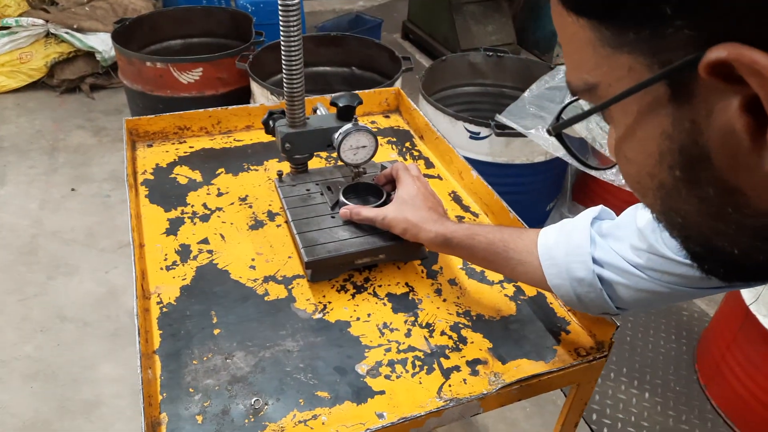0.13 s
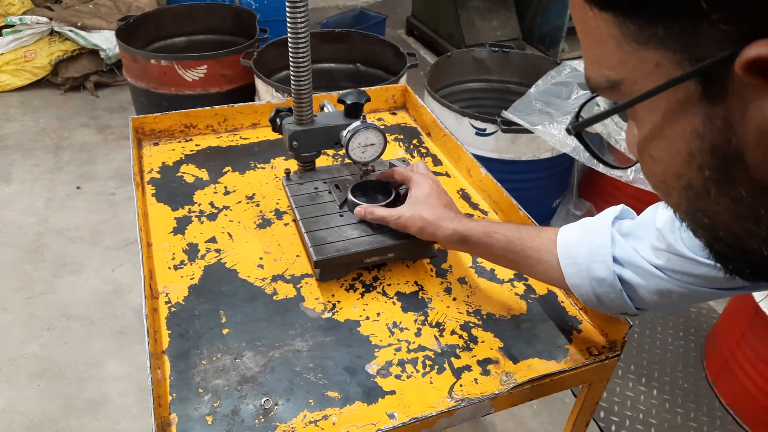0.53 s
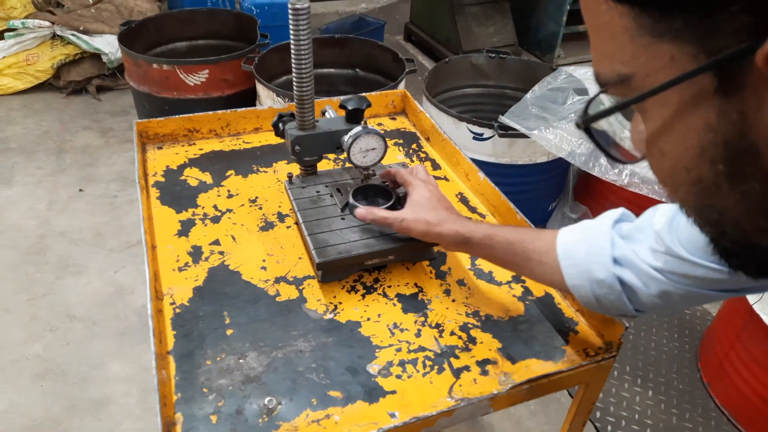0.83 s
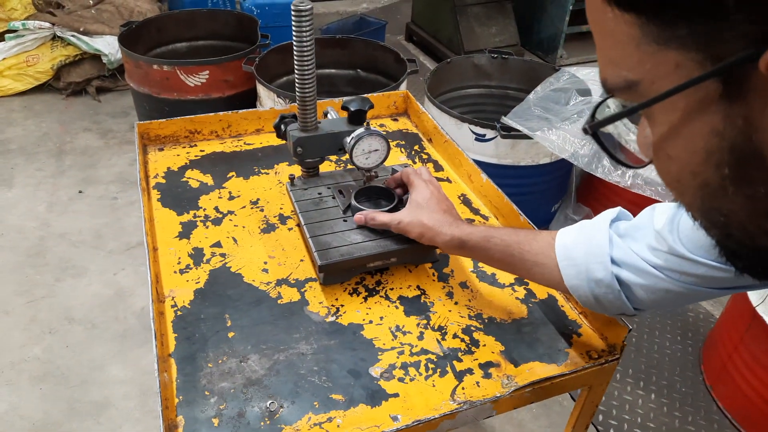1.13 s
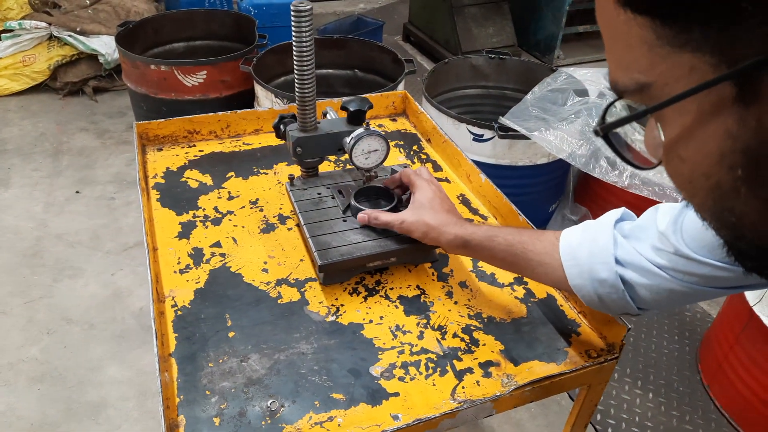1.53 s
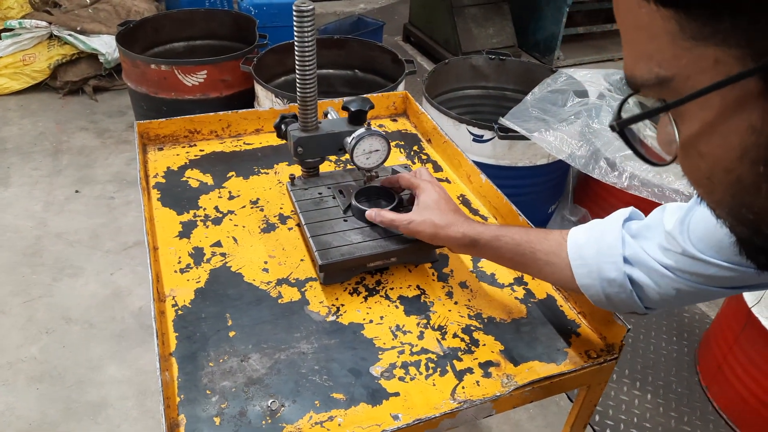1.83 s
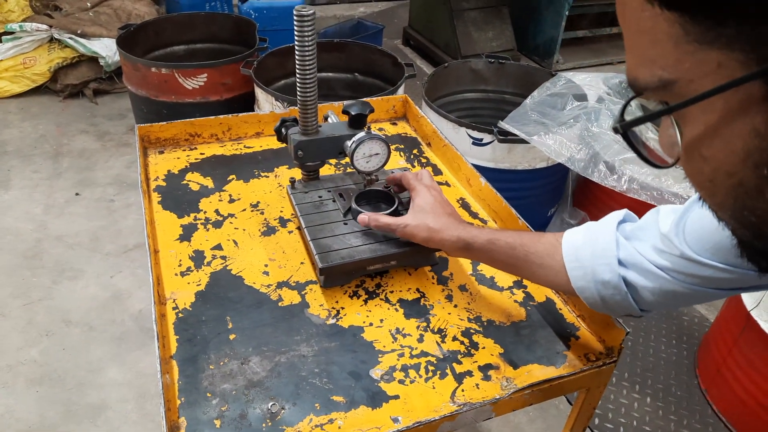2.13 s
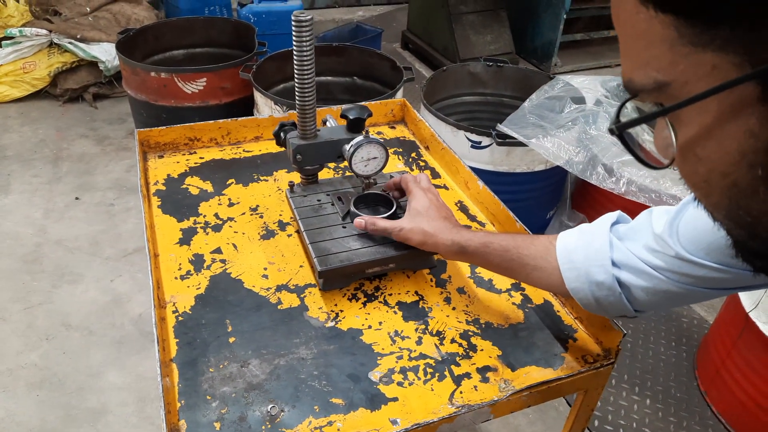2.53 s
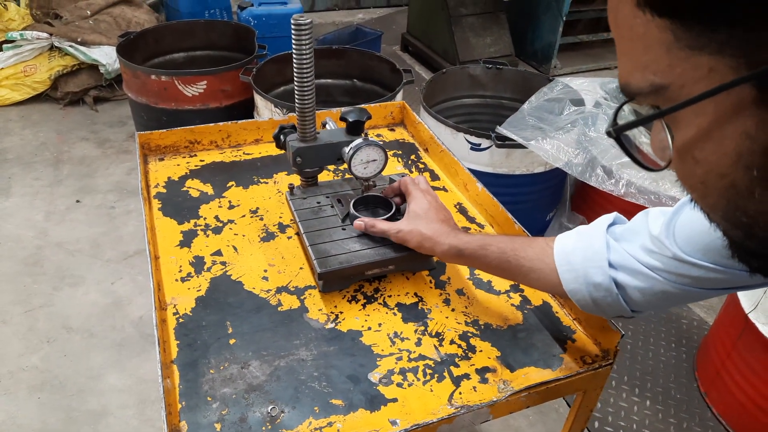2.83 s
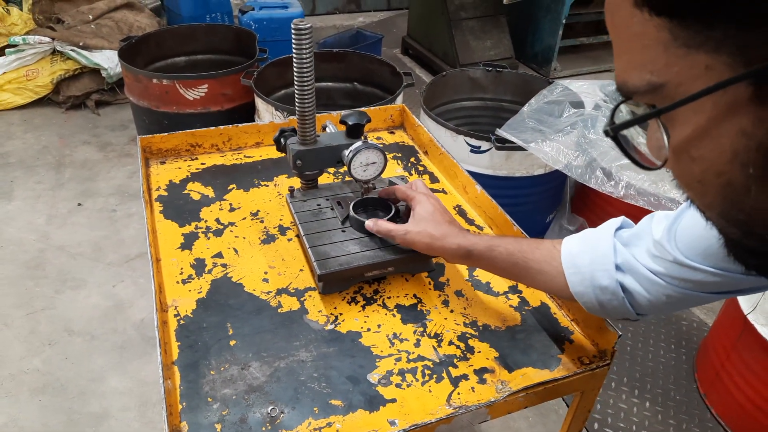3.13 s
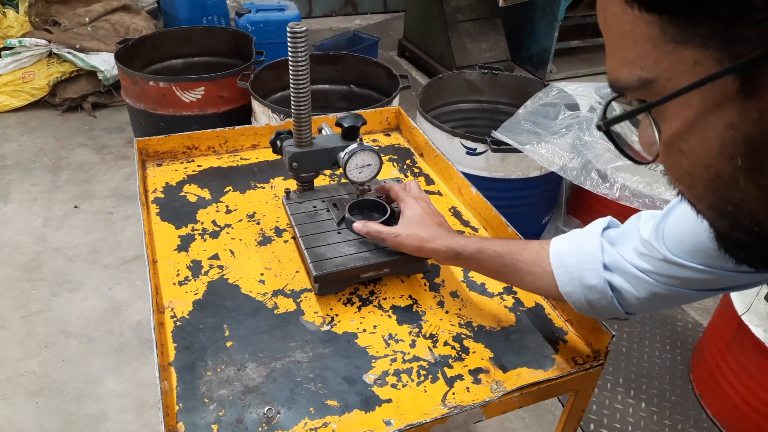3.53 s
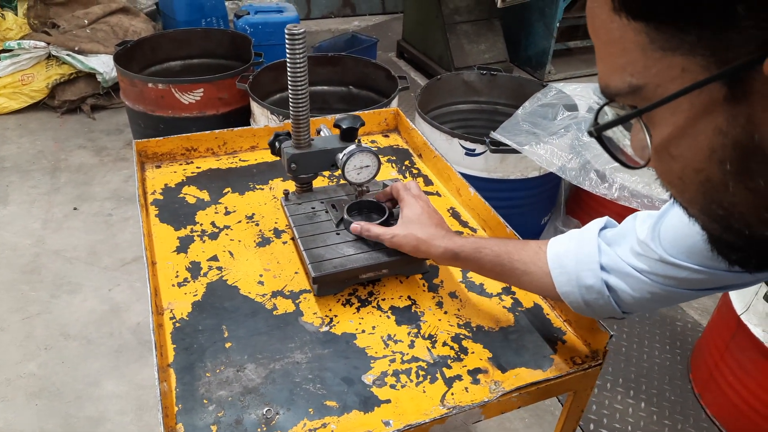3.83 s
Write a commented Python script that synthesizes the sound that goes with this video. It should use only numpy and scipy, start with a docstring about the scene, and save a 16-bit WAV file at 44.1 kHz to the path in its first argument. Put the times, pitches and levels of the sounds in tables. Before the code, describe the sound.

A hand-held steel ring clinks sharply on a metal plate in two bursts, over swelling machinery noise.

```python
"""A hand-held steel ring slides over a gauge plate on a sheet-metal trolley, then rocks and clinks against it.
Each contact sums a burst of noise (crack), damped low sines of the trolley (thud) and the ring's own
chattering modes, damped by the fingers; friction during the slide sustains the same modes as narrow-band tones.
Workshop machinery rushes (filtered noise) and whines (wavering tones) behind; one level curve lifts this
background twice and lowers it at the first clink of each group."""
import sys
import numpy as np
from scipy import signal
from scipy.fft import rfft, irfft
from scipy.io import wavfile

SR = 44100
rng = np.random.default_rng(int(sys.argv[2]) if len(sys.argv) > 2 else 0)


def transcribe(u):
    """Save the signal u as a 16-bit wav file named by the first command-line argument.

    u: samples, shape (n,) or (channels, n), limited to [-1, 1]; the rate is SR.
    q: integer samples, one column per channel.
    """
    v = np.clip(np.atleast_2d(u).T, -1, 1)
    q = np.round(v * 32767).astype(np.int16)
    wavfile.write(sys.argv[1], SR, q)


N = 176400
T = np.arange(N) / SR   # time, s


def from_db(db):
    """Logarithmic level: decibels to amplitude gain."""
    return 10 ** (np.asarray(db) / 20)


def rms_one(x):
    """Normalization by mean power: scale to unit rms."""
    return x / np.sqrt(np.mean(np.abs(x) ** 2) + 1e-20)


def in_time(rows):
    """Linear interpolation: a control curve at every sample."""
    return np.interp(T, *np.transpose(rows))


def at_hz(points, hz):
    """Logarithmic frequency scale: interpolate a table on it."""
    f, values = np.transpose(points)
    return np.interp(np.log(hz), np.log(f), values)


def pan(lean_db):
    """Interchannel level difference: left and right gains of unit mean power."""
    return rms_one(from_db(np.array([[lean_db], [-lean_db]]) / 2))


def ports(hz, lag_s):
    """Interchannel phase difference: the left channel trails the right by the lag."""
    return np.exp(2j * np.pi * hz * lag_s * np.array([[0], [1]]))


def wander(hz, size):
    """Narrow-band random process: complex noise through two equal low-pass poles at hz, near unit power."""
    step = 20   # samples between drawn values
    warm_up = 2000   # drawn values discarded while the filter settles
    pole = np.exp(-2 * np.pi * hz * step / SR)
    noise = rng.standard_normal((size // step + warm_up + 2, 2)) @ [1, 1j]
    slow = rms_one(signal.lfilter([1], [1, -2 * pole, pole * pole], noise)[warm_up:])
    return np.interp(np.arange(size) / step, np.arange(len(slow)), slow)


def stereo_wander(hz):
    """Interchannel incoherence: an independent random process in each channel."""
    return np.array([wander(hz, size=N), wander(hz, size=N)])


def coloured(x, spectrum, balance):
    """Minimum-phase filtering: a causal response of unit power with the given spectrum and balance."""
    size = 8192
    hz = np.maximum(np.arange(size // 2 + 1) * SR / size, 1)
    lean = from_db(at_hz(balance, hz))
    sides = np.array([lean, np.ones_like(lean)]) / np.hypot(lean, 1)
    gain = rms_one(from_db(at_hz(spectrum, hz)) * sides)
    # folding the cepstrum onto positive time makes the phase minimum
    fold = np.r_[1, np.full(size // 2 - 1, 2), 1, np.zeros(size // 2 - 1)]
    response = irfft(np.exp(rfft(irfft(np.log(gain)) * fold)))
    return signal.fftconvolve(x, response, axes=1)[:, :N]


def decay(t, t60):
    """Exponential damping: amplitude falls by 60 dB in t60 seconds."""
    return np.exp(-np.log(1000) * t / t60)


def add(out, s, x):
    """Superposition: mix a sound in at time s, cut at the end."""
    i = int(s * SR)
    out[:, i:i + x.shape[-1]] += x[..., :N - i]


# gain curve that lifts and lowers the whole background, noise and tones together:
# t/s, level/dB before each source's own gain
BACKGROUND_LEVEL = [(0, -35.5), (.38, -35), (.55, -31.5), (.73, -28), (.79, -24.5), (1.0, -24), (1.13, -26),
                    (1.2, -33), (1.4, -36.5), (2.3, -36.5), (2.5, -33), (2.8, -27.5), (3.08, -23),
                    (3.39, -25), (3.48, -36), (3.7, -35.5), (4, -35)]
# spectral density of the rush: f/Hz, relative level/dB per Hz
RUSH_SPECTRUM = [(30, -42), (41, -16.5), (58, -6.5), (180, -4), (240, -6.5), (320, -1), (460, -7.5),
                 (600, -9.5), (860, -7.5), (1020, -11), (1300, -10.5), (1850, -10), (2300, -11.5),
                 (2800, -15), (4300, -16.5), (5500, -20.5), (7000, -22), (8100, -19.5), (8950, -33),
                 (10200, -32), (11800, -25.5), (15600, -32)]
# stereo balance of the rush: f/Hz, left minus right level/dB
RUSH_BALANCE = [(60, 2), (200, 2.5), (700, 5.5), (6000, 2.5), (8100, 17.5), (10300, 23), (11500, 8),
                (14000, 4)]
# interchannel coherence of the rush: f/Hz, left-right correlation/1
RUSH_CORRELATION = [(50, 0.93), (150, 0.97), (330, 0.8), (600, 0.36), (850, 0.069), (1300, -0.45),
                    (2200, 0.12), (4000, 0.1), (12000, -0.17)]
RUSH_DB = 1
FLICKER_DB, FLICKER_HZ = 1.1, 12   # the flicker's rms is 0.71 of this depth
BASS_FOLLOWS, BASS_EDGE_HZ = 0.91, 600   # share of the gain change, in dB, given to bands below the edge


def workshop(level_db):
    """Band-filtered noise: third octaves flicker independently; the gain curve moves the bass a little less."""
    edges = 20 * 2 ** (np.arange(31) / 3)
    white, out = rng.standard_normal((2, 2, N)), 0
    for k, (low, high) in enumerate(zip(edges, edges[1:])):
        hz = np.sqrt(low * high)
        band = signal.butter(2, [low, high], "band", fs=SR, output="sos")
        mid, side = signal.sosfilt(band, white[k % 2])   # neighbouring bands use different noise
        alike = np.clip(at_hz(RUSH_CORRELATION, hz), -.99, .99)
        follows = BASS_FOLLOWS if hz < BASS_EDGE_HZ else 1
        lift_db = follows * (level_db - level_db.mean())
        gain = from_db(lift_db + FLICKER_DB * wander(FLICKER_HZ, size=N).real)
        common = np.sqrt((1 + alike) / 2) * mid
        opposed = np.sqrt((1 - alike) / 2) * side * [[1], [-1]]
        out = out + gain * (common + opposed)
    return from_db(RUSH_DB + level_db.mean()) * coloured(out, RUSH_SPECTRUM, RUSH_BALANCE)


# motor drones and whines: f/Hz
MACHINE_TONE_HZ = [100, 286, 316, 393, 447, 895, 3750, 3850, 3950, 4050, 4249, 4948]
# the same tones: level/dB relative to the mean background level, bandwidth of the waver/Hz
MACHINE_TONES = [(-20.5, 2.5), (-13, 5.8), (-10, 10.3), (-15, 3.1), (-22.5, 3.4), (-24.5, 3.9), (-22, 1.3),
                 (-29, 1.5), (-17, 2.2), (-25, 2.5), (-19, 2.9), (-25, 1.4)]
HUM_LAG_S = 0.00018


def hum(level_db, drone_follows=0.59, whine_follows=.9, lean_db=3, waver=0.46):
    """Random modulation of steady tones: wavering motor drones and a comb of thin whines."""
    out = 0
    for hz, (db, width_hz) in zip(MACHINE_TONE_HZ, MACHINE_TONES):
        follows = drone_follows if hz < BASS_EDGE_HZ else whine_follows
        gain = from_db(db + follows * (level_db - level_db.mean()))
        envelope = rms_one(.5 + waver * wander(width_hz, size=N))
        tone = envelope * np.exp(2j * np.pi * (hz * T + rng.random()))
        out = out + gain * (tone * ports(hz, HUM_LAG_S)).real
    return np.sqrt(2) * out * pan(lean_db) * from_db(level_db.mean())   # root 2: unit rms of a real tone


# pressure of the sliding ring: t/s, level/dB before the levels of the modes
SLIDE_PRESSURE = [(0, -67), (.7, -57), (.77, -31.5), (1.1, -28.5), (1.2, -60), (2.5, -54), (2.9, -44),
                  (3.1, -28.5), (3.38, -35), (3.46, -53)]
# nominal pitches of the ring's modes: f/Hz
RING_MODE_HZ = [2556, 4676, 7222, 12530, 13685]
# the same modes: relative level/dB, left minus right level/dB, t60 relative to the contact's/1
RING_MODE_SHAPE = [(-1, 6, 0.75), (-13, 4, 1.9), (0.5, 13.5, 1.74), (-3.5, 10, 1.02), (-0.5, 9, 0.82)]
SLIDE_WIDTH_HZ = 35


def sliding(tilt_db_per_octave=-9):
    """Frictional excitation: the ring's modes sing softly as narrow-band tones, the low one most."""
    song = 0
    for hz, (db, lean_db, _) in zip(RING_MODE_HZ, RING_MODE_SHAPE):
        tilt_db = tilt_db_per_octave * np.log2(hz / RING_MODE_HZ[0])
        tone = stereo_wander(SLIDE_WIDTH_HZ) * np.exp(2j * np.pi * hz * T)
        song = song + from_db(db + tilt_db) * pan(lean_db) * tone.real
    return from_db(in_time(SLIDE_PRESSURE)) * song


# contacts of ring and plate: t/s, crack level/dB, thud level/dB,
# low, middle and top ring tone level/dB, ring t60/s before each mode's factor
CONTACT_ROWS = [(1.1355, -14, -13.5, -17, -15, -14.5, 0.082), (1.1418, -19, -12, -16, -24, -26, .1),
                (1.158, -33, -17, -16, -17, -23, 0.095), (1.174, -21, -15, -24, -14.5, -20, 0.093),
                (1.1784, -34, -27, -6.5, -21, -21, 0.094), (1.1994, -36, -14, -24, -30, -32, .1),
                (1.211, -40, -19, -12, -23.5, -23, 0.2), (1.255, -28, -29, -21.5, -28, -32, 0.091),
                (1.2789, -24.5, -25, -21, -38, -40, 0.34), (1.302, -38, -40, -19, -26, -33, 0.13),
                (1.3676, -18, -13, -14, -18, -18, 0.066), (3.406, -13.5, -4.5, -12, -30, -17, .11),
                (3.418, -21, -36, -23, -16.5, -18, 0.098), (3.439, -22, -11, -11, -16.5, -17, .07),
                (3.457, -33, -15.5, -27, -20.5, -29, 0.08), (3.494, -44, -27, -31, -24, -37, 0.23),
                (3.5501, -19, -22, -5.5, -14, -16, 0.088), (3.5999, -20, -17, -13, -25.5, -22.5, .1),
                (3.675, -25.5, -21.5, -21.5, -28.5, -36, 0.25), (3.7156, -30, -36, -42, -32, -34, 0.15),
                (3.7777, -24, -21.5, -34, -23.5, -27, 0.11), (3.7878, -29, -25, -13.5, -23.5, -33, 0.072),
                (3.814, -44, -37, -33, -32, -39, 0.21), (3.9226, -24.5, -24, -12, -24.5, -26.5, 0.037)]
# spectral density of the crack: f/Hz, relative level/dB per Hz
CRACK_SPECTRUM = [(200, 4), (600, 3.5), (1500, -4), (3200, 4.5), (6000, -5), (8200, 3.5), (10000, -5.5),
                  (11800, -9), (15000, -7.5)]
# stereo balance of the crack: f/Hz, left minus right level/dB
CRACK_BALANCE = [(300, 2.8), (3000, 6.6), (6500, 2), (8200, 23), (11000, 27), (14000, 29)]
CRACK_T60_S, CRACK_TAIL_DB, CRACK_TAIL_T60_S = 0.031, -13.5, 0.31
CRACK_GRAIN_DB, CRACK_GRAIN_HZ = 6.5, 600   # the grain's rms is 0.71 of this depth


def cracks():
    """Broadband impact noise: a gritty burst at each contact, with a short diffuse tail."""
    out, t = np.zeros((2, N)), T[:SR // 3]
    for s, db, *_ in CONTACT_ROWS:
        grit = rms_one(from_db(CRACK_GRAIN_DB * wander(CRACK_GRAIN_HZ, size=len(t)).real))
        tail = from_db(CRACK_TAIL_DB) * decay(t, CRACK_TAIL_T60_S)
        shape = grit * decay(t, CRACK_T60_S) + tail
        add(out, s, from_db(db) * shape * rng.standard_normal((2, len(t))))
    return coloured(out, CRACK_SPECTRUM, CRACK_BALANCE)


# trolley and plate modes: nominal f/Hz, level/dB relative to the contact's thud, t60/s
TROLLEY_MODES = [(125, -21, 0.092), (216.3, -7.5, 0.12), (292, 1, 0.049), (377.7, -6, .06),
                 (559, -10, 0.041), (810, -14, .03)]


def thuds(lean_db=3.0, rise_s=0.0015, scatter=0.039):
    """Impulsive modal excitation: the plate passes each blow to the trolley's damped low modes."""
    out, t = np.zeros((2, N)), T[:SR // 3]
    for s, _, db, *_ in CONTACT_ROWS:
        body = 0
        for hz, mode_db, t60 in TROLLEY_MODES:
            pitch = hz * (1 + scatter * rng.standard_normal())
            body = body + from_db(db + mode_db) * decay(t, t60) * np.sin(2 * np.pi * pitch * t)
        add(out, s, -pan(lean_db) * body * (1 - np.exp(-t / rise_s)))
    return out


# the ring also plays the contact and ring mode tables above
MODE_REGISTER = [0, 1, 1, 2, 2]   # low, middle or top tone level for each mode
MODE_SPLIT, TWIN_DB = .005, -13.5   # relative frequency gap and level of each mode's twin
MODE_SCATTER = 0.0014   # relative pitch scatter from the grip
RING_RISE_S, RING_LAG_S = 0.003, .00007
AFTER_RING_DB, AFTER_RING_T60_S = -23.5, 0.57
CHATTER, CHATTER_HZ, CHATTER_T60_S = 0.77, 40, 0.12   # bandwidth on the lowest mode, rising with pitch
RASP, RASP_HZ = 0.51, 131   # share and bandwidth of the fastest chatter


def ring():
    """Split normal modes: each contact excites beating twins that chatter, then ring on faintly."""
    out, t = 0, T[:SR // 2]
    latest = np.searchsorted([c[0] for c in CONTACT_ROWS], T)
    rise = 1 - np.exp(-t / RING_RISE_S)
    for hz, (db, lean_db, length), register in zip(RING_MODE_HZ, RING_MODE_SHAPE, MODE_REGISTER):
        energy = np.zeros((2, N))   # clean ringing, chatter; contacts add in energy
        for s, _, _, *tones_db, t60 in CONTACT_ROWS:
            after_ring = from_db(AFTER_RING_DB) * decay(t, AFTER_RING_T60_S)
            clean = decay(t, t60 * length) + after_ring
            parts = np.array([clean, CHATTER * decay(t, CHATTER_T60_S)])
            add(energy, s, (from_db(tones_db[register]) * rise * parts) ** 2)
        clean, rough = np.sqrt(energy)
        # each contact shifts the pitch a little
        pitch = hz * (1 + MODE_SCATTER * rng.standard_normal(len(CONTACT_ROWS) + 1))[latest]
        carrier = np.exp(2j * np.pi * np.cumsum(pitch) / SR)
        twin = from_db(TWIN_DB) * np.exp(2j * np.pi * (hz * MODE_SPLIT * T + rng.random((2, 1))))
        chatter = stereo_wander(CHATTER_HZ * hz / RING_MODE_HZ[0]) + RASP * stereo_wander(RASP_HZ)
        body = clean * (1 + twin) + rough * chatter
        out = out + from_db(db) * pan(lean_db) * (body * carrier * ports(hz, RING_LAG_S)).real
    return out


def scene():
    """Superposition of sources: the ring on its plate in front of the machinery."""
    level_db = in_time(BACKGROUND_LEVEL)
    background = workshop(level_db) + hum(level_db)
    return background + sliding() + cracks() + thuds() + ring()


def record(dry):
    """Saturation and band limiting: peaks are rounded and the top is cut."""
    rounded = 1.245 * np.tanh(dry / 1.151)
    top_cut = signal.ellip(10, .1, 80, 15780, fs=SR, output="sos")   # order, ripple/dB, stop/dB, edge/Hz
    return signal.sosfilt(top_cut, rounded)


dry = scene()
out = record(dry)
transcribe(out)
```